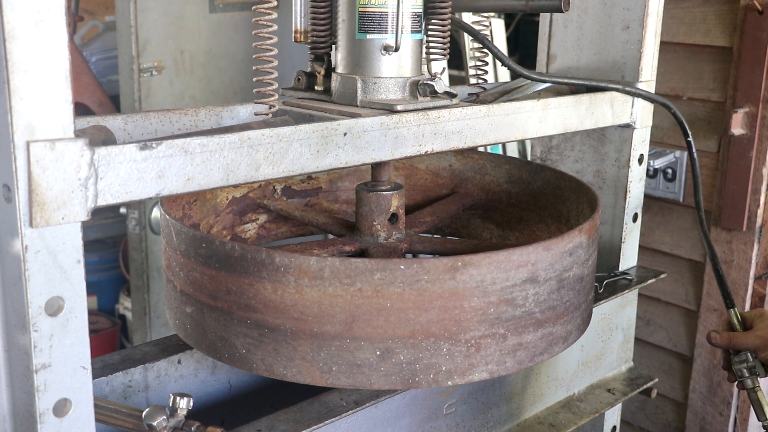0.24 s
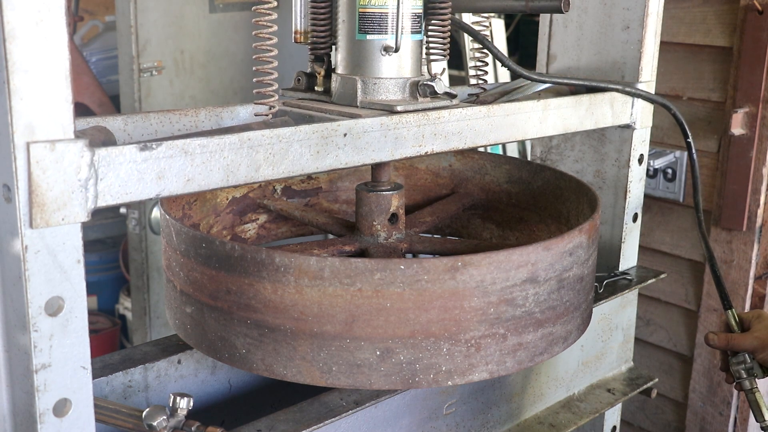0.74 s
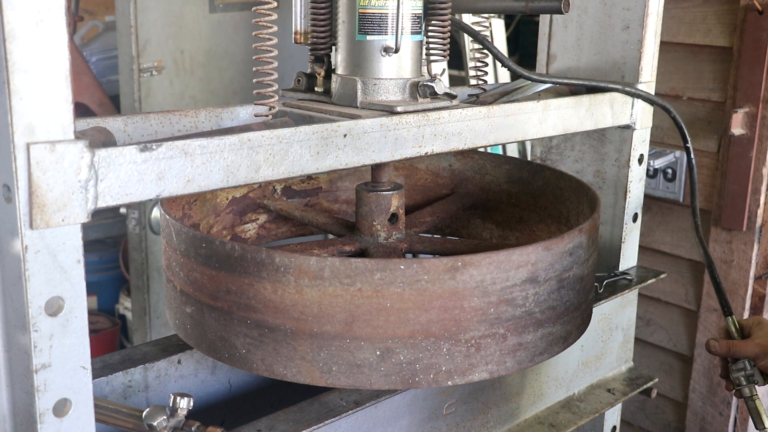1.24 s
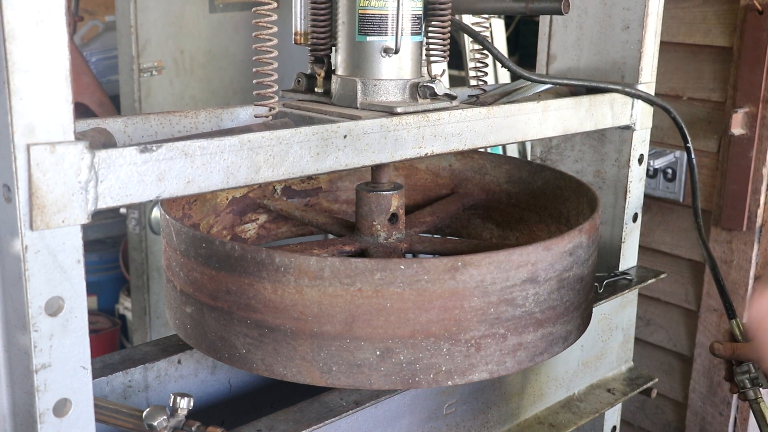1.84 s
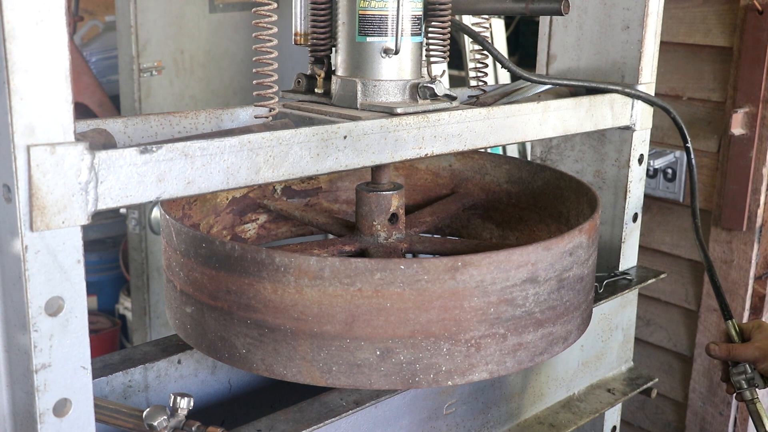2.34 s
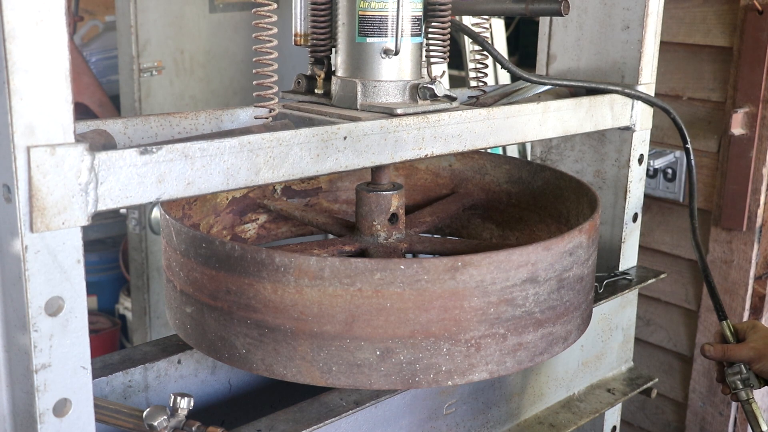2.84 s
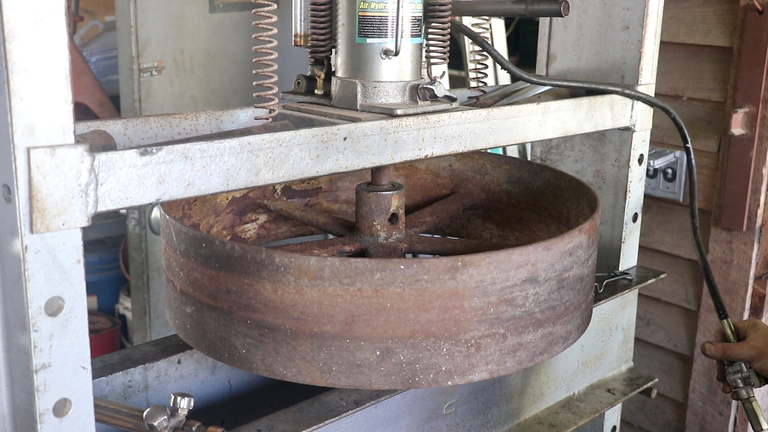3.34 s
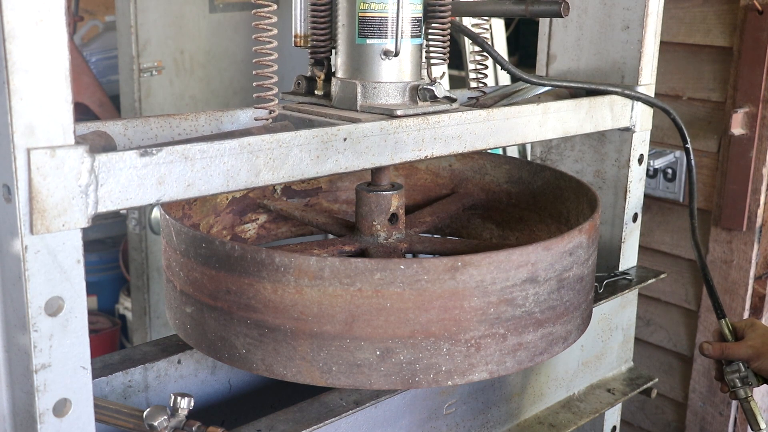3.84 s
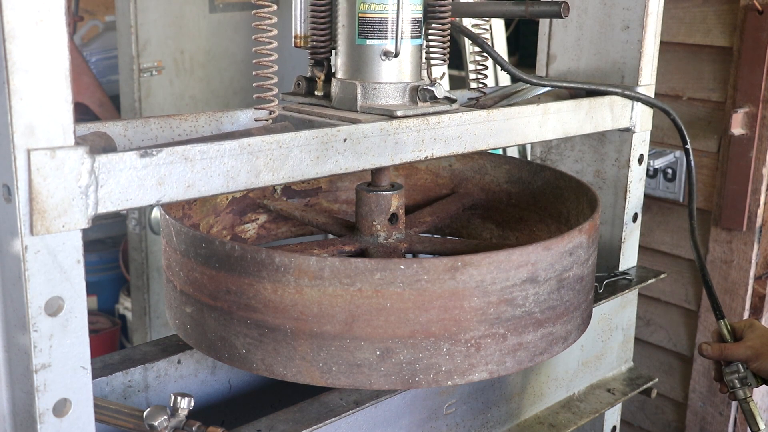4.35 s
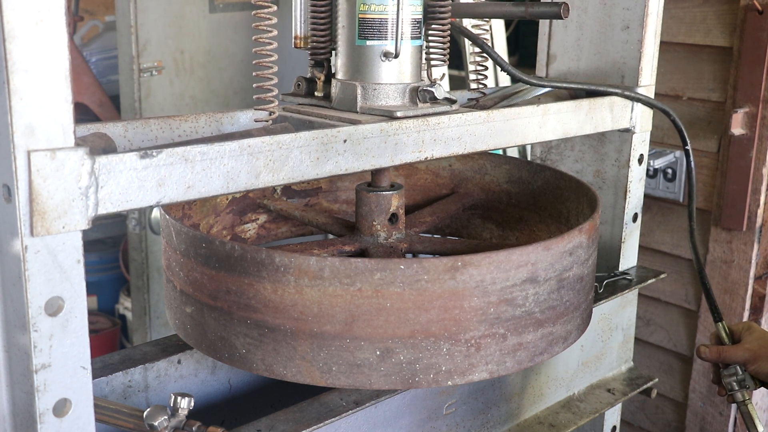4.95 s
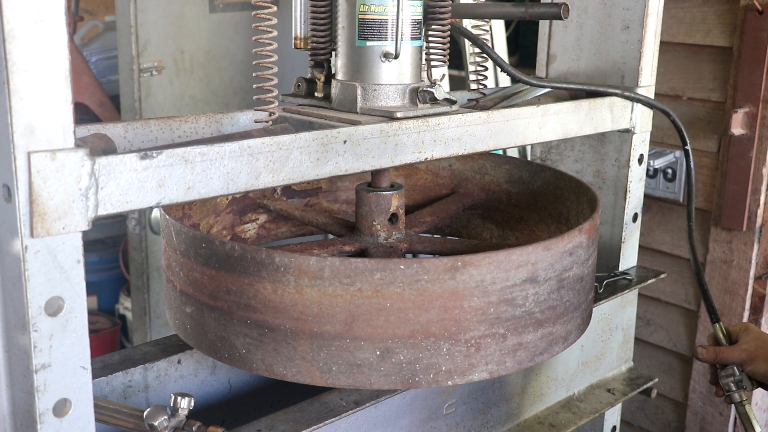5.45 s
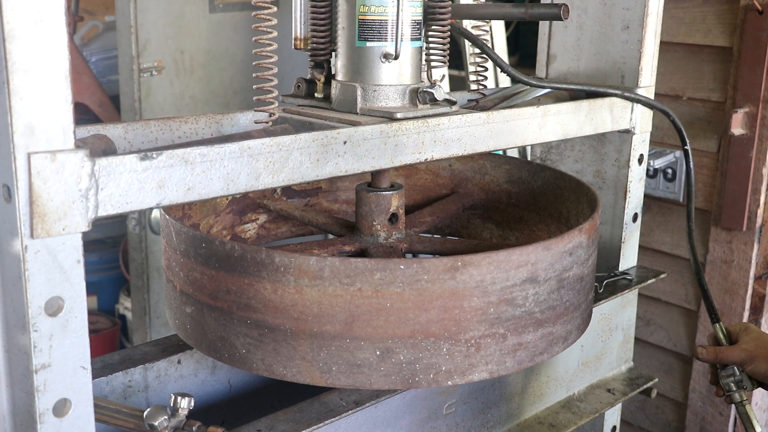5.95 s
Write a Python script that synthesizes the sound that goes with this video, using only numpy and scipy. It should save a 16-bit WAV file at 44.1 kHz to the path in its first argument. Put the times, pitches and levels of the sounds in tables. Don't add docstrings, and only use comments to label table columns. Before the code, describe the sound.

Rapid, even pneumatic pumping in a small workshop: popping exhaust puffs and clanking piston knocks ring a steel press frame above steady air hiss.

```python
import sys
import numpy as np
from scipy import signal
from scipy.fft import rfft, irfft, next_fast_len
from scipy.io import wavfile
from scipy.ndimage import uniform_filter1d

SR = 44100
rng = np.random.default_rng(int(sys.argv[2]) if len(sys.argv) > 2 else 0)


def pcm_store(signal):
    levels = np.round(np.clip(np.atleast_2d(signal), -1, 1) * 32767)
    wavfile.write(sys.argv[1], SR, levels.astype(np.int16).T)


def ratio_of_db(decibels):
    return 10 ** (np.asarray(decibels, float) / 20)


N = 272538
LEAD = 8192
LONG = N + LEAD

# (stroke number [count], time to the next stroke [s])
STROKE_PACE = [
    (0, .16556),
    (6, .16636),
    (9, .16181),
    (11, .16316),
    (17, .16420),
    (37, .16007),
]
# (time [s], hiss level [dB])
SUPPLY_HISS = [(0.0, -33), (0.46, -31), (0.72, -33.5), (1.07, -30), (1.44, -32), (1.79, -34.5), (2.2, -32),
               (2.77, -31), (3.11, -33.5), (3.44, -30), (3.61, -32), (4.63, -32), (4.8, -31), (5.92, -33.5),
               (6.18, -32)]
# (time [s], puff change [dB], wake change [dB])
ODD_STROKES = [(.26, 2, 1.5), (.59, 1.5, -2), (.76, -3, -0.5), (1.26, -2.5, -4), (1.91, -1.5, 1.5),
               (2.24, 0.5, 2.5), (2.73, -3, -2), (3.38, 1, 1.5), (3.71, 0, -4), (4.04, -2, 0.5),
               (4.69, -0.5, -8), (5.17, -3.5, 1.5), (5.49, -0.5, 3), (6.14, -1.5, 1.5)]
# (time [s], level above 2 kHz [dB])
CAN_LOAD = [
    (0, -4),
    (1.2, -4),
    (2.2, -2),
    (6.2, -1.3),
]
# (time after the stroke [ms], signed strength [ratio])
VALVE_STEPS = [
    (-1.11, 0.21),
    (0.16, -1.0),
    (1.61, 0.21),
    (2.99, -0.99),
    (8.0, 0.19),
]
# (time after the stroke [ms], signed strength [ratio])
PISTON_CONTACTS = [
    (30.08, 0.15),
    (31.76, 0.61),
    (34.48, 1.0),
    (37.4, 0.69),
    (40.8, 0.31),
]
# (frequency [Hz], signed swing from pop [thousandths], signed swing from knock [thousandths], t60 [s])
METAL_MODES = [(157.9, -105.9, -75.6, 0.121), (194.1, 113.5, -6.2, 0.065), (226.0, 3.8, 71.9, 0.773),
               (325.2, 35.4, 37.6, 0.014), (397.4, 1.2, 3.2, 0.554), (418.3, 0.5, 4.0, 0.95),
               (464.6, 1.7, -6.2, 0.7), (511.0, 15.1, 15.6, 0.357), (608.8, -13.8, 13.7, 0.24),
               (651.9, 17.8, 21.9, 0.17), (745.7, -1.5, -3.6, 0.249), (844.1, 8.2, 39.6, 0.145),
               (882.5, 9.7, 16.5, 0.16), (975.6, -17.4, 23.4, 0.022), (1010.9, 0.3, -4.7, 0.7),
               (1053.6, 1.9, 0.5, 0.7), (1073.2, -5.5, -9.1, 0.088), (1137.1, -1.4, -3.5, 0.38),
               (1165.6, -2.0, 14.4, 0.42), (1202.2, -2.8, -7.8, 0.527), (1240.0, -18.1, 2.8, 0.7),
               (1316.3, -9.0, -13.9, 0.2), (1316.6, 14.9, 9.3, 0.073), (1445.9, 0.3, -1.7, 0.635),
               (1493.0, 1.5, -14.5, 0.288), (1545.1, -13.2, -23.4, 0.057), (1937.4, 7.3, -25.2, 0.044),
               (2444.0, -12.6, -27.2, 0.034), (2489.8, 7.5, 42.1, 0.046), (3169.1, 0.8, -0.8, 0.666)]
MODE_LEVEL = [2.27, 2.44, 1.86, 1, 1, 3, 1.7, 3.5, 3, -4, 0, -0.8, -0.2, 3, 2.5, -3, 1.8, 5, -1.5, 4, 4.5,
              4, 6.5, -3, -2, 2.5, 1, -0.5, 3, 10.5]
# (frequency [Hz], level [dB])
HISS_COLOUR = [(100, -35), (220, -33), (500, -5.5), (1200, -4.5), (1900, -2.5), (2400, -10), (3300, -1.5),
               (4400, -1), (5400, -0.5), (7200, -7), (9300, -13.5), (11500, -9), (13200, -9.5),
               (15800, -14)]
# (frequency [Hz], level [dB])
PUFF_COLOUR = [(150, -5.5), (400, -24), (1000, -11.5), (2000, -6), (3000, -4), (5000, -1), (7000, -7),
               (9500, -10.5), (13000, -9), (16000, -14)]
# (frequency [Hz], level [dB])
WAKE_COLOUR = [(130, -13.5), (210, -13), (400, -2), (1000, -6.5), (2000, -8.5), (3200, -4.5), (4800, -3.5),
               (6500, -8), (9500, -15), (12500, -13.5), (16000, -30)]
# (time [s], bands [count])
WIDE_MOMENTS = [(1.357, 3), (2.658, 1), (3.493, 3), (3.517, 3), (4.469, 1), (4.492, 2), (4.817, 1),
                (5.467, 1), (5.607, 1), (5.746, 2)]


def rms_one(x):
    return x / np.sqrt(np.mean(x ** 2) + 1e-20)


def coloured(spectrum):
    hz, level_db = np.transpose(spectrum)
    size = next_fast_len(LONG)
    grid_hz = np.maximum(np.arange(size // 2 + 1) * SR / size, 10)
    shape = ratio_of_db(np.interp(np.log(grid_hz), np.log(hz), level_db))
    shape = shape * np.minimum(grid_hz / hz[0], 1) ** 2
    return rms_one(irfft(rfft(rng.standard_normal(size)) * shape, size)[:LONG])


def drift(rate_hz):
    r = np.exp(-2 * np.pi * rate_hz / SR)
    return rms_one(signal.lfilter([1], [1, -2 * r, r * r], rng.standard_normal(LONG)))


def ring(clicks, hz, t60):
    r = 10 ** (-3 / (t60 * SR))
    w = 2 * np.pi * hz / SR
    return signal.lfilter([0, np.sin(w)], [1, -2 * r * np.cos(w), r * r], clicks + 1e-18)


def swell(clicks, rise_ms, fall_ms):
    up, down = np.exp(-1000 / SR / rise_ms), np.exp(-1000 / SR / fall_ms)
    poles = np.convolve([1, -2 * up, up * up], [1, -down])
    return signal.lfilter([(1 - up) ** 2], poles, clicks + 1e-18)


def train(s, level_db, pattern):
    clicks = np.zeros(LONG + SR)
    for ms, strength in pattern:
        at = np.round((s + ms / 1000) * SR).astype(int) + LEAD
        np.add.at(clicks, at, strength * ratio_of_db(level_db))
    return clicks[:LONG]


def strokes():
    first_stroke_s = 0.0950
    periods = np.interp(np.arange(-1, 37), *np.transpose(STROKE_PACE))
    s = first_stroke_s - periods[0] + np.append(0, np.cumsum(periods))
    at, hiss_db = np.transpose(SUPPLY_HISS)
    pressure_db = hiss_db - hiss_db.mean()
    before = np.interp(s - 0.03, at, pressure_db)
    after = np.interp(s + 0.06, at, pressure_db)
    odd = np.zeros((len(s), 2))
    for when, *change_db in ODD_STROKES:
        odd[np.argmin(abs(s - when))] = change_db
    odd_puff, odd_wake = odd.T
    chance = (rng.standard_normal((len(s), 4)) * [0.46, 0.98, 0.45, 0.75]).T
    pop_db = -0.57 + 0.39 * before + chance[0]
    knock_db = 1.1 + 0.7 * after + 0.24 * odd_wake + chance[1]
    puff_db = -11.5 + 0.12 * before + odd_puff + chance[2]
    wake_db = -25.5 + 0.2 * after + odd_wake + chance[3]
    return s, pop_db, knock_db, puff_db, wake_db


def supply(s):
    t = (np.arange(LONG) - LEAD) / SR
    filled = np.interp(t, s + 0.018, np.arange(len(s)), left=0) % 1
    filled = uniform_filter1d(filled, size=900)
    level_db = np.interp(t, *np.transpose(SUPPLY_HISS)) + 0.93 * drift(6.8)
    air = ratio_of_db(level_db) * coloured(HISS_COLOUR)
    treble = signal.sosfilt(signal.butter(2, 7500, "high", fs=SR, output="sos"), air)
    return air * ratio_of_db(5.3 * (filled - 0.5)) + treble * (ratio_of_db(filled) - 1)


def exhaust(s, puff_db, wake_db):
    puff = swell(train(s, puff_db, [(0.1, 0.99)]), rise_ms=1.48, fall_ms=3.16) * coloured(PUFF_COLOUR)
    wake = swell(train(s, wake_db, [(1.7, 1)]), rise_ms=2.2, fall_ms=24.3) * coloured(WAKE_COLOUR)
    jet = (puff + wake) * ratio_of_db(2.22 * drift(136))
    return jet + ratio_of_db(-42) * ring(jet, hz=2475, t60=0.05)


def metal_body(s, pop_db, knock_db, air):
    rust_loss_per_s = 0.52
    chance = rng.standard_normal((len(s), len(METAL_MODES), 2))
    can_db = np.interp(s, *np.transpose(CAN_LOAD))
    out = 0
    for k, (hz, by_pop, by_knock, t60) in enumerate(METAL_MODES):
        scatter_db = min(hz / 700, 1) ** 2 * chance[:, k]
        load_db = can_db * (hz > 2000)
        blows = by_pop * train(s, pop_db + scatter_db[:, 0], VALVE_STEPS)
        blows += by_knock * train(s, knock_db + load_db + scatter_db[:, 1], PISTON_CONTACTS)
        murmur = ratio_of_db(-70.5) * air / np.sqrt(t60)
        damped_t60 = 1 / (1 / t60 + rust_loss_per_s)
        out = out + ratio_of_db(MODE_LEVEL[k]) * ring(blows / 1000 + murmur, hz, damped_t60)
    return out


def workshop(x):
    room_t60, dull_hz = 0.6, 3240
    t = np.arange(SR // 2) / SR
    onset = np.clip((t - 0.004) / 0.0029, 0, 1)
    echoes = rng.standard_normal(len(t)) * 10 ** (-3 * t / room_t60) * onset
    echoes = signal.sosfilt(signal.butter(1, dull_hz, fs=SR, output="sos"), echoes)
    return signal.fftconvolve(x, echoes / np.sqrt(np.sum(echoes ** 2)))[:LONG]


def bump():
    bump_s, bump_db = 0.8557, -19.5
    t = np.maximum((np.arange(LONG) - LEAD) / SR - bump_s, 0)
    turns = 85 * t + 0.95 * (1 - np.exp(-t / 0.008))
    envelope = (1 - np.exp(-t / 0.0015)) * np.exp(-(t / 0.011) ** 1.3)
    return ratio_of_db(bump_db) * np.sin(2 * np.pi * turns) * envelope


def wide_treble(mono):
    half, delay = 1024, 700
    low_edge_hz, high_edge_hz, width = 4100, 13200, 1.2
    side = np.zeros(N)
    moments = [s for s, bands in WIDE_MOMENTS for _ in range(bands)]
    lows_hz = rng.permutation(np.geomspace(low_edge_hz, high_edge_hz, len(moments)))
    for s, low_hz in zip(moments, lows_hz):
        at = round(s * SR) - half
        older = mono[at - delay:at - delay + 2 * half] * np.hanning(2 * half)
        band = signal.ellip(6, 0.5, 60, [low_hz, low_hz * width], "band", fs=SR, output="sos")
        side[at:at + 2 * half] += signal.sosfilt(band, older)
    return ratio_of_db(-1.0) * side * [[1], [-1]]


def scene():
    s, pop_db, knock_db, puff_db, wake_db = strokes()
    hiss = supply(s)
    jet = exhaust(s, puff_db, wake_db)
    metal = metal_body(s, pop_db, knock_db, hiss + 0.5 * jet)
    room = workshop(ratio_of_db(-15.5) * metal + ratio_of_db(-14.5) * jet)
    heard = hiss + jet + metal + room + bump()
    return np.tile(heard[LEAD:], (2, 1))


def top_cut(x):
    return signal.sosfilt(signal.butter(12, 16080, fs=SR, output="sos"), x)


def record(dry):
    x = signal.sosfilt(signal.butter(1, 70, "high", fs=SR, output="sos"), dry)
    x = 0.6 * np.tanh(x / 0.6)
    x = signal.sosfilt(signal.ellip(10, 0.1, 70, 15720, fs=SR, output="sos"), x)
    return top_cut(x + wide_treble(x[0]))


dry = scene()
out = record(dry)
pcm_store(out)
```